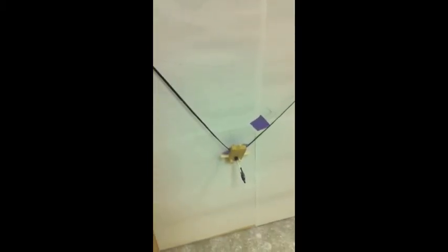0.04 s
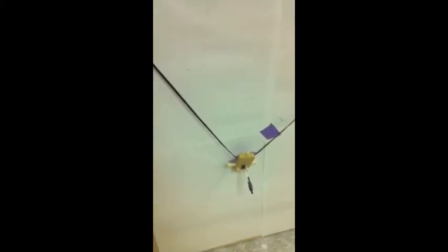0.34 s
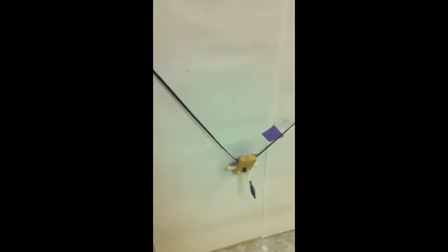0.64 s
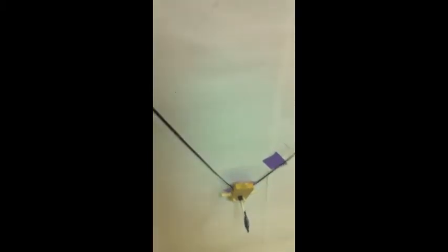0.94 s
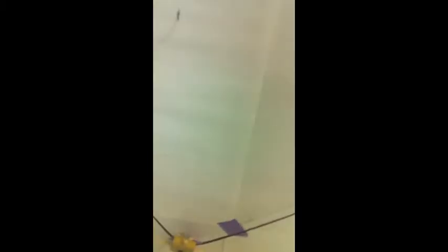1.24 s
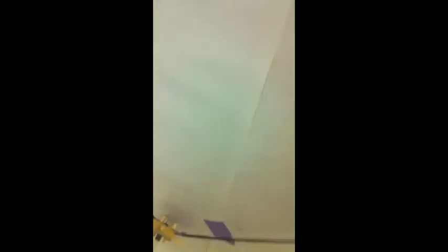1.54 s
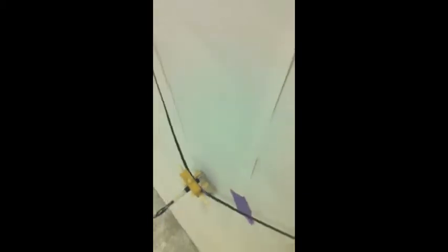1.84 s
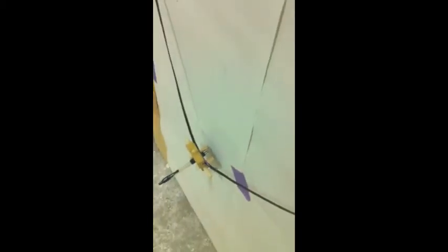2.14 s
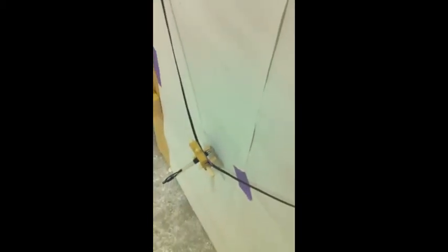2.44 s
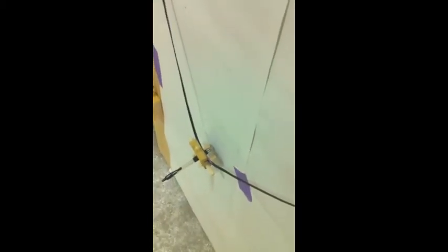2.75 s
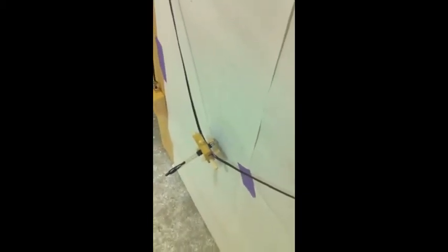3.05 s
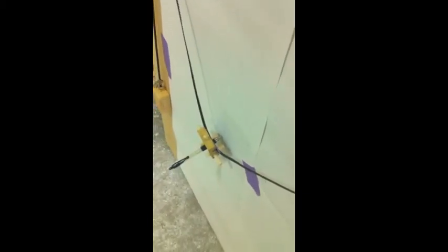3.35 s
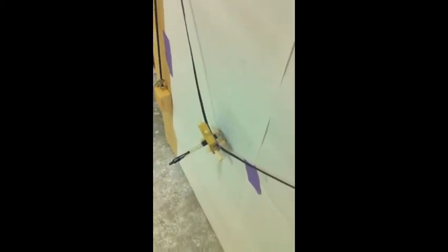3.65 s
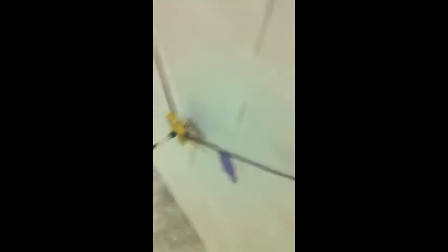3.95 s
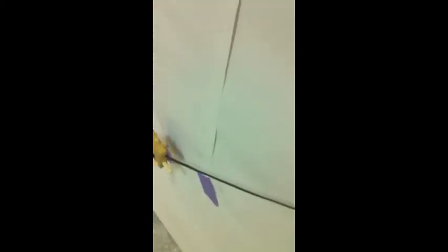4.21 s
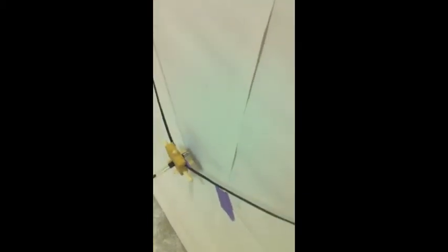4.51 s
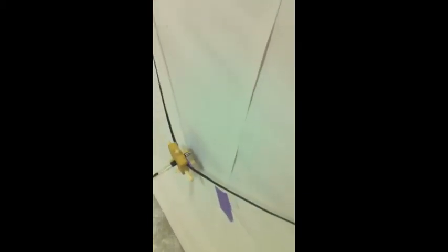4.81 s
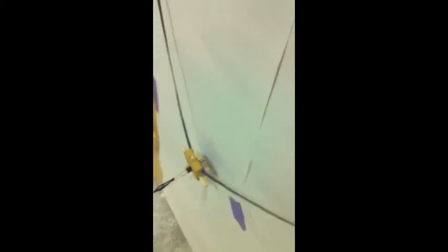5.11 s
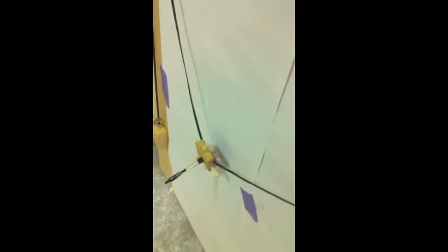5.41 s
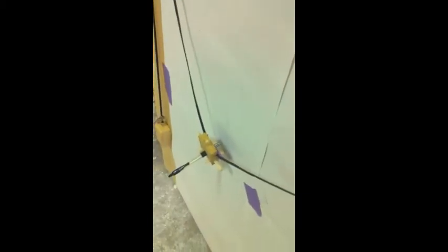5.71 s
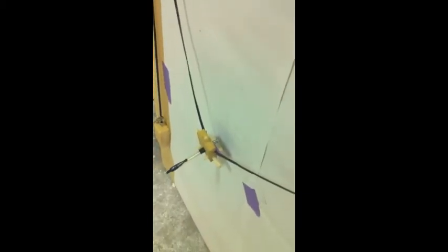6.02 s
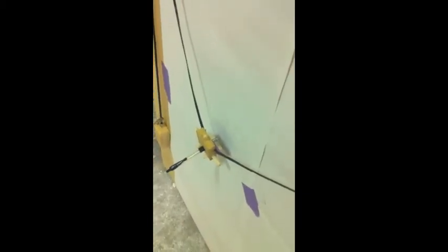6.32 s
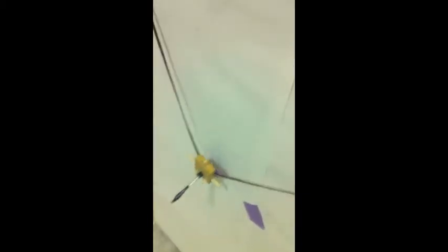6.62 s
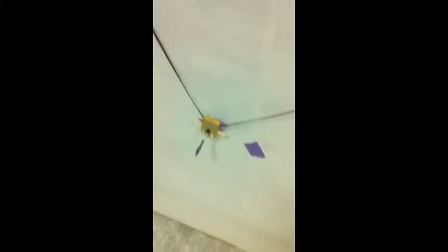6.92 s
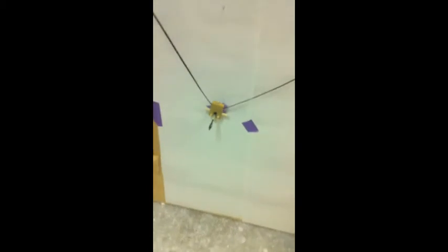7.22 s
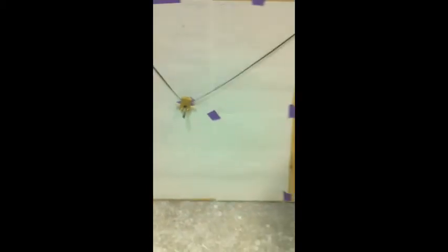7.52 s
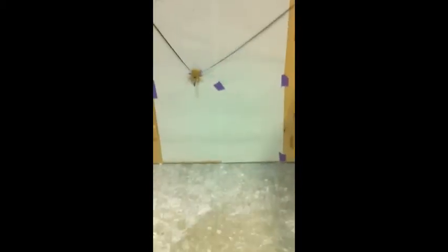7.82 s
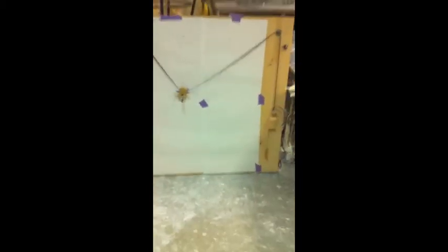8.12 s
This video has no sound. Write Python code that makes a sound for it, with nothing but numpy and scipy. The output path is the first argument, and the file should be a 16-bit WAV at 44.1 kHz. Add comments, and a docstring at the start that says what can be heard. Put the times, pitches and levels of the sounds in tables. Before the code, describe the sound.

A hanging drawing machine buzzes from the very start in a workshop, heard from a handheld phone. Its two small stepper motors run in about ten even bursts over eight seconds, each lasting roughly 0.65 seconds with a 0.15 second pause. Every burst has the same low-mid pitched drone, a rough buzz from the board, a fine rattle of loose parts and a thin, very high metallic ring. The pauses hold a short room echo and faint steady hiss. The sound grows louder and brighter until about 2 seconds as the microphone closes in, then stays close, with very soft low handling bumps. From about 6.7 seconds the microphone backs away and the machine becomes quieter and more echoing. Shoes scuff faintly on concrete, very briefly at about 7.1 seconds and a little longer at 7.9 seconds.

```python
"""A hanging plotter at work

A plotter draws short strokes on a board in a workshop with a concrete floor, heard from a moving phone.
Two stepper motors get their steps in 10 ms slices. Every step knocks the motor mounts (a drone) and
the board (a buzz) and shakes loose parts (a rattle and a high ring). Between strokes the room rings
out over a faint hiss. The phone bumps softly, and shoes scuff twice as it backs away."""
import sys
import numpy as np
from scipy import signal
from scipy.fft import rfft, irfft
from scipy.io import wavfile

SR = 44100
rng = np.random.default_rng(int(sys.argv[2]) if len(sys.argv) > 2 else 0)


def generate_wav(sig):
    """Save sig (samples, or channels by samples) to the path in sys.argv[1] as 16-bit PCM at SR."""
    pcm = np.round(np.clip(np.atleast_2d(sig).T, -1, 1) * 32767).astype(np.int16)
    wavfile.write(sys.argv[1], SR, pcm)


N = 359856
TIME = np.arange(N) / SR

SLICE_S, SLICES_PER_STROKE = .01, 65
FIRST_STROKE_S, STROKE_EVERY_S, STROKE_COUNT = -.0413, .8003, 11
# the fast motor, then the slow one:
# (travel per stroke [steps], owed at the very start [steps], part of a slice its steps fill [0-1])
MOTORS = [(229.5, .1875, 1), (99.5, .1875, .86)]


def step_times(steps, owed, spread, inertia=.14, memory=.4):
    """A slice holds whole steps and passes the remainder on, so the step rate flips between two values."""
    per_slice, strokes = steps / SLICES_PER_STROKE, []
    for stroke in range(STROKE_COUNT):
        due = owed + stroke * steps + per_slice * np.arange(SLICES_PER_STROKE + 1)
        counts = np.diff(np.floor(due)).astype(int)
        sent = SLICE_S * np.concatenate([k + spread * np.arange(n) / n for k, n in enumerate(counts)])
        # the inertia of the rotor (the turning part) pulls the steps a little towards an even pace
        early = SLICE_S * np.arange(len(sent)) / per_slice - sent
        age = sent + inertia * early
        # in a quick slice the steps run ahead of the rotor, which then catches up
        lead = signal.lfilter([1, -1], [1, -memory], early * per_slice / SLICE_S)
        strokes.append((FIRST_STROKE_S + stroke * STROKE_EVERY_S + age, age, lead))
    return np.hstack(strokes)


def knocks(motor, uneven_db, jitter_s, rise_s, start_db=-6, lead_db=0, half_width=8):
    """One uneven knock a step; its size can change as the rotor gets going or falls behind the steps."""
    when, age, lead = step_times(*motor)
    size_luck, time_luck = rng.standard_normal((len(when), 2)).T
    size = undb(uneven_db * np.clip(size_luck, -2, 2) + start_db * np.exp(-age / rise_s) + lead_db * lead)
    centre = (when + jitter_s * time_luck) * SR
    # a sinc-shaped pulse lets a knock land between two samples
    index = centre.astype(int)[:, None] + np.arange(-half_width, half_width + 1)
    lag = index - centre[:, None]
    pulse = size[:, None] * np.sinc(lag) * np.sinc(lag / (half_width + 1))
    inside = (index >= 0) & (index < N)
    return np.bincount(index[inside], pulse[inside], N)


def mount_drone():
    """The motor mounts ring near the fast motor's step rate."""
    # tone of the mounts: (frequency [Hz], level [dB])
    tone = [(100, -46.5), (190, -35.5), (245, -4), (300, -9.5), (350, -8), (420, 1), (450, -8.5),
            (500, -12), (600, -26), (1000, -73.5)]
    # where they ring: (frequency [Hz], width [Hz], boost [dB])
    peaks = [(421, 29.6, 7.1), (260, 25, 6.4)]
    fast = knocks(MOTORS[0], uneven_db=1.44, jitter_s=.00006, rise_s=.016, start_db=-7, lead_db=10)
    slow = knocks(MOTORS[1], uneven_db=1.5, jitter_s=.0001, rise_s=.04)
    return shape_tone(fast + undb(-5.5) * slow, tone, peaks)


def board_buzz():
    """The board gives off the overtones of both motors' steps, roughened by slack in the drive."""
    # tone of the board: (frequency [Hz], level [dB])
    tone = [(200, -45), (430, -5), (520, 0.5), (600, -1.5), (650, -4.5), (720, 0.5), (800, -4),
            (1050, -6.5), (1300, -5.5), (1700, -8), (2300, -11), (2800, -18), (3600, -33), (6000, -51)]
    # where it rings: (frequency [Hz], width [Hz], boost [dB])
    peaks = [(547.8, 29.3, 12.56), (584, 19.4, 6.3), (698.8, 15.5, 8.7), (933, 52, 9.6), (991, 22, 5.2),
             (1658, 25, 10), (2080, 55, 3.6), (2390, 66, 3.3)]
    fast = knocks(MOTORS[0], uneven_db=3.8, jitter_s=.00008, rise_s=.0084, lead_db=1.5)
    slow = knocks(MOTORS[1], uneven_db=.7, jitter_s=.00006, rise_s=.0071, start_db=0)
    steps = undb(-7) * fast + slow
    roughness = rasp(steps, crack_s=.067, tail_s=.053, tail_db=2.5)
    return shape_tone(steps + undb(-2) * roughness, tone, peaks)


def loose_ticks():
    """Loose parts tick with the steps, now hard and now soft."""
    fast = knocks(MOTORS[0], uneven_db=1, jitter_s=.000312, rise_s=.013, start_db=-16)
    slow = knocks(MOTORS[1], uneven_db=4, jitter_s=.000187, rise_s=.008, start_db=1.5)
    return undb(-5.5) * fast + slow


def loose_rattle(ticks):
    """Each tick shakes a bright burst of noise out of the loose parts."""
    # tone of the loose parts: (frequency [Hz], level [dB])
    tone = [(500, -31), (1500, -0.5), (3000, -1), (4300, -3), (5600, -1.5), (7800, -0.5), (9500, -8),
            (12500, -13), (15800, -24)]
    # where they ring: (frequency [Hz], width [Hz], boost [dB])
    peaks = [(3210, 74, 6.1), (5840, 180, 4.1), (6880, 180, 3.3), (7500, 130, 2)]
    return shape_tone(rasp(ticks, crack_s=.0066, tail_s=.041, tail_db=3), tone, peaks)


def metal_ring(ticks):
    """Small metal parts ring high up, with a tone that depends on the angle they are heard from."""
    # tone of the metal parts: (frequency [Hz], level [dB])
    tone = [(3000, -31), (7000, -11), (8500, -4.5), (10000, -4.5), (11500, -3.5), (13000, -6.5),
            (15800, -9)]
    # where they ring, from the front and from the side: (frequency [Hz], width [Hz], boost [dB])
    front_peaks = [(9050, 980, 11), (10070, 200, 2.4), (12400, 300, 4.4)]
    side_peaks = [(9900, 2900, 13.4)]
    shake = rasp(ticks, crack_s=.015, tail_s=.045, tail_db=-7)
    front = unit(shape_tone(shake, tone, front_peaks))
    side = unit(shape_tone(shake, tone, side_peaks))
    _, angle = phone_position()
    return (1 - angle) * front + angle * side


def rasp(hits, crack_s, tail_s, tail_db):
    """Every knock shakes loose contacts in a new way: noise with two fades, a crack and a tail."""
    energy = fading_energy(hits, crack_s) + undb(tail_db) ** 2 * fading_energy(hits, tail_s)
    return rng.standard_normal(N) * np.sqrt(energy)


def fading_energy(hits, fade_s):
    """The energy of each knock dies away by 60 dB in fade_s."""
    kept = np.exp(-2 * np.log(1000) / (fade_s * SR))
    return signal.lfilter([1 - kept], [1, -kept], hits ** 2 + 1e-18)


def phone_position():
    """The phone closes in, lingers in front of the machine and backs away."""
    # its path: (time [s], distance [m], angle [0 in front, 1 at the side])
    path = [(.1, 0.84, 0.69), (.9, 0.71, 0.93), (1.3, 0.64, 0.9), (1.85, 0.47, 0.75), (2.15, 0.52, 0.13),
            (3.6, 0.5, 0.059), (4.4, 0.46, 0.13), (4.85, 0.48, .03), (5.8, 0.55, 0.034), (6.65, 0.6, 0.49),
            (7.25, 1.21, 0.41), (7.7, 1.72, 0.34)]
    times, metres, angle = np.transpose(path)
    return np.interp(TIME, times, metres), np.interp(TIME, times, angle)


def heard_db(near_db, fall_db, side_db, near_m=.5):
    """A part loses fall_db each time the distance doubles and changes by side_db from the side."""
    metres, angle = phone_position()
    return near_db - fall_db * np.log2(metres / near_m) + side_db * angle


def in_room(x, level_db, room_db, echo_growth=.79):
    """Set a part's level; the fainter it gets, as with distance, the larger the share of echo."""
    echo_gain = undb(room_db - echo_growth * (level_db - level_db.mean()))
    return unit(x + echo_gain * room_echo(x)) * undb(level_db)


def room_echo(x, gap_s=.0053):
    """The workshop's echoes blur together; the treble dies first."""
    # how long the room rings: (frequency [Hz], time to fade by 60 dB [s])
    fade_times = [(300, 0.31), (1000, 0.36), (3000, 0.26), (10000, 0.23)]
    t = TIME[:SR]
    noise, hz = rfft(rng.standard_normal(SR)), np.arange(SR // 2 + 1)
    edges_hz = [0, 500, 1000, 2000, 4000, 8000, SR / 2]
    tail = 0
    for low, high in zip(edges_hz, edges_hz[1:]):
        band = irfft(noise * (hz >= low) * (hz < high), SR)
        fade = np.exp(-np.log(1000) * t / read_curve(fade_times, (low + high) / 2))
        tail = tail + band * fade * (t > gap_s)
    return convolve(x, tail / np.linalg.norm(tail))


def shoe_scuffs(rise_s=.0047, grain_db=3):
    """Grit between a sole and the concrete makes a short, grainy hiss."""
    # each scuff: (time [s], fade [s], level [dB])
    scuffs = [(7.112, 0.023, -55), (7.92, 0.11, -50)]
    # tone of the grit: (frequency [Hz], level [dB])
    tone = [(1000, -25), (4000, -1), (7000, 0), (11000, -3), (15800, -6)]
    loudness = 0
    for start, fade_s, db in scuffs:
        age = np.maximum(TIME - start, 0)
        loudness = loudness + undb(db) * (1 - np.exp(-age / rise_s)) * np.exp(-age / fade_s)
    grit = rng.standard_normal(N) * undb(grain_db * wander(400))
    return loudness * unit(shape_tone(grit, tone))


def handling_bumps(rattle_db):
    """Soft, uneven low bumps, strongest close to the machine, where the rattle is loudest too."""
    tone = [(20, 2), (120, 4), (200, -8), (500, -56)]  # (frequency [Hz], level [dB])
    rumble = shape_tone(rng.standard_normal(N), tone)
    swell_db = 11 * wander(26) + 7.3 * (rattle_db - rattle_db.mean())
    return unit(rumble * undb(swell_db)) * undb(-70)


def workshop_noise(level_db=-47):
    """Steady workshop noise with a faint hiss from the motors holding their place."""
    # tone of the background: (frequency [Hz], level [dB])
    tone = [(30, -33), (90, -35), (150, -22), (260, -5), (400, 4), (600, -5.5), (1000, -14), (2000, -21.5),
            (3300, -28), (4100, -21), (4800, -28.5), (9000, -35), (15800, -43)]
    return unit(shape_tone(rng.standard_normal(N), tone)) * undb(level_db + .27 * wander(7.6))


def shape_tone(x, tone, peaks=(), size=16384):
    """Filter a sound the way an object does: a broad tone with ringing peaks on top."""
    hz = np.arange(size // 2 + 1) * SR / size
    peaks_db = sum(boost / (1 + (2 * (hz - centre) / width) ** 2) for centre, width, boost in peaks)
    cepstrum = irfft(np.log(undb(read_curve(tone, hz) + peaks_db)))
    # folding onto the first half makes the ringing follow a knock and never come before it
    cepstrum[1:size // 2] *= 2
    cepstrum[size // 2 + 1:] = 0
    return convolve(x, irfft(np.exp(rfft(cepstrum))))


def convolve(x, response):
    """Give every sample of a sound the same ringing response."""
    return signal.oaconvolve(x.astype(np.float32), response.astype(np.float32))[:N]


def read_curve(points, hz):
    """Read between (frequency [Hz], value) points, with all octaves equally wide."""
    known_hz, values = np.transpose(points)
    return np.interp(np.log(np.maximum(hz, 1)), np.log(known_hz), values)


def wander(rate_hz):
    """A random drift, roughly between -1 and 1."""
    points = rng.standard_normal(int(N / SR * rate_hz) + 2)
    return np.interp(TIME * rate_hz, np.arange(len(points)), points)


def undb(db):
    """Turn decibels into a gain."""
    return 10 ** (np.asarray(db) / 20)


def unit(x):
    """Scale a sound to an average (rms) level of 1."""
    return x / np.sqrt(np.mean(x ** 2))


def scene():
    """Four sounds of the same steps, each at its level for the phone's position, over the background."""
    # the metal ring flares and sinks as the phone moves: (time [s], level [dB])
    ring_levels = [(0.05, -53), (1.25, -51), (1.33, -44.6), (1.81, -39), (2.69, -45), (2.85, -42.5),
                   (4.13, -42), (4.21, -42.5), (4.85, -43.5), (6.69, -43), (6.77, -49.5), (6.93, -48),
                   (7.65, -56.5), (8.05, -54.5)]
    ticks = loose_ticks()
    rattle = loose_rattle(ticks)
    rattle_db = heard_db(near_db=-43, fall_db=5.5, side_db=1.35)
    machine = in_room(mount_drone(), heard_db(near_db=-30, fall_db=5, side_db=3.5), room_db=-12.5)
    machine += in_room(board_buzz(), heard_db(near_db=-32.5, fall_db=5.5, side_db=-2.5), room_db=-2.5)
    machine += in_room(rattle, rattle_db, room_db=-5.5)
    machine += in_room(metal_ring(ticks), np.interp(TIME, *np.transpose(ring_levels)), room_db=-11.5)
    return (machine + workshop_noise() + shoe_scuffs() + handling_bumps(rattle_db))[None]


def record(dry):
    """The phone steeply cuts the highest treble."""
    top_hz = 15900
    return signal.sosfilt(signal.ellip(12, .2, 80, top_hz, fs=SR, output="sos"), dry)


dry = scene()
out = record(dry)
generate_wav(out)
```